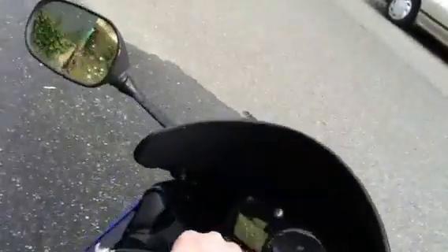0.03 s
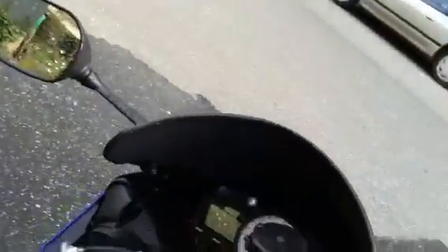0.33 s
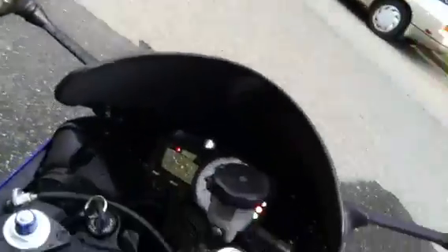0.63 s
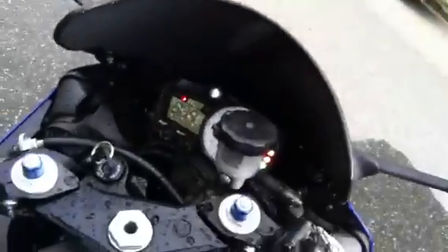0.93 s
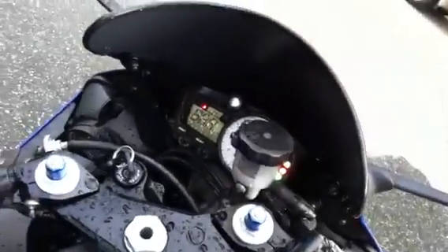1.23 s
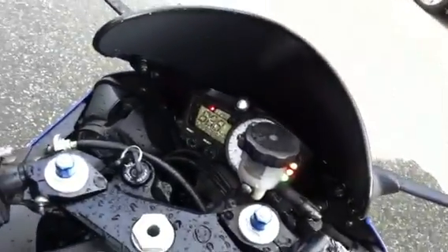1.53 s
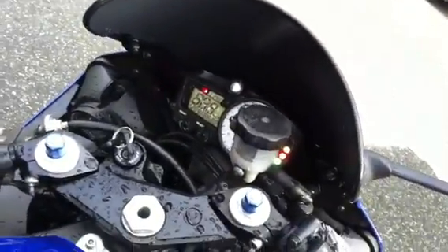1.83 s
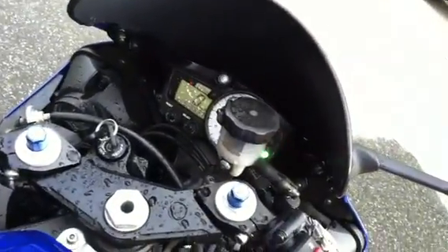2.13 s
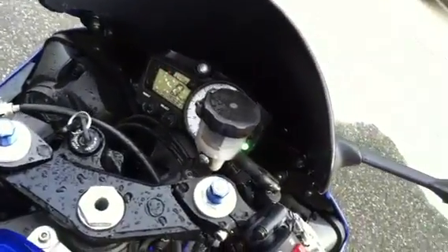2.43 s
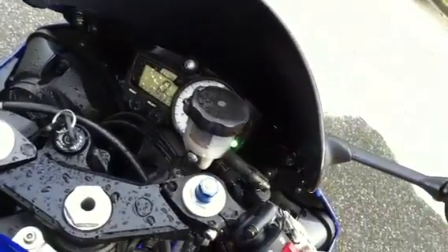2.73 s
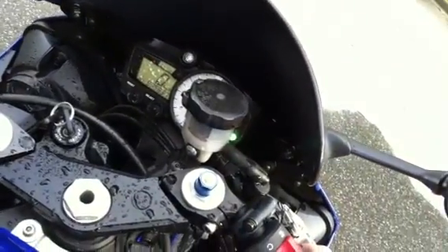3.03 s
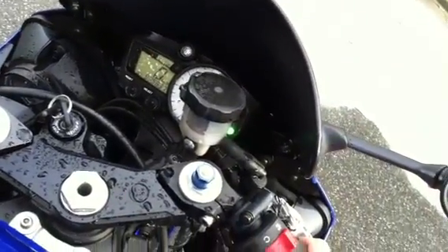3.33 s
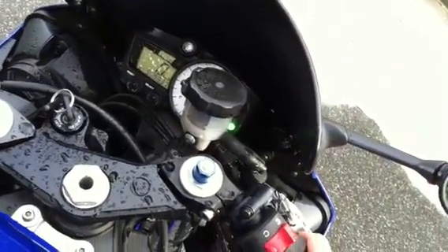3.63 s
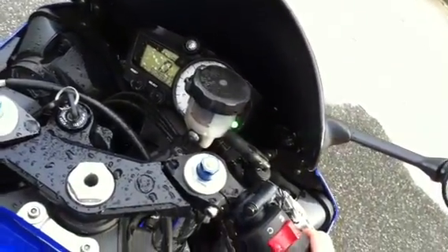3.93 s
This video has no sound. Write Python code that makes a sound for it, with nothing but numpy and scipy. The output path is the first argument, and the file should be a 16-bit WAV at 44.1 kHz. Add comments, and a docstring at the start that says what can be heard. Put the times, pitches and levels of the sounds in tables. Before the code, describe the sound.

A key clicks and a motorcycle's fuel pump whines steadily before the starter kicks in.

```python
"""An ignition key snaps on, close below the microphone, which is above the handlebars of a motorcycle
parked in a quiet street. A relay clicks; the electric fuel pump spins up, whines for three seconds
while the fuel churns, then runs down. The starter button ticks, the solenoid slams shut and the
starter gears begin to crank the engine. Traffic murmurs in the distance."""
import sys
import numpy as np
from scipy import signal
from scipy.fft import rfft, irfft
from scipy.io import wavfile
from scipy.ndimage import uniform_filter1d

SR = 44100
rng = np.random.default_rng(int(sys.argv[2]) if len(sys.argv) > 2 else 0)


def to_wav(sig):
    """Store sig (one row per channel, or 1-D mono) as 16-bit WAV at the path in sys.argv[1].

    Samples outside -1..1 are clipped; the rate is SR.
    """
    pcm = np.clip(np.atleast_2d(sig), -1, 1) * 32767
    pcm = np.round(pcm).astype(np.int16)
    wavfile.write(sys.argv[1], SR, pcm.T)  # frames by channels


N = 176400

# vane-passing rate of the pump, sagging as fuel pressure builds: t/s, f/Hz
VANE_RATE = [(.5, 4545), (.63, 4510), (.93, 4488), (1.12, 4477), (1.3, 4459), (1.5, 4448), (1.75, 4444),
             (2.0, 4432), (2.5, 4425), (2.8, 4418), (3.02, 4402), (3.35, 4393)]
# three whine partials, swelling and fading as the microphone moves: t/s, level/dB before the tilt
WHINE_FIRST = [(0.42, -55), (0.44, -53), (0.66, -62.5), (0.78, -54), (0.87, -56.5), (0.9, -51.5),
               (1.01, -49), (1.36, -55.5), (1.7, -52.5), (2.61, -58.5), (2.66, -63), (3.09, -59),
               (3.36, -60.5)]
WHINE_SECOND = [(0.42, -74), (0.44, -72), (1.17, -73), (1.3, -64), (1.69, -65), (1.71, -61), (2.54, -74),
                (3.12, -60), (3.36, -64)]
WHINE_THIRD = [(0.42, -63), (0.67, -59), (0.73, -67), (1.16, -57), (1.25, -63), (1.4, -61), (1.48, -67),
               (1.61, -61), (1.68, -66), (1.8, -57), (2.22, -53.5), (2.65, -64), (2.84, -60), (3.36, -64)]
# pump motor hum: t/s, lower tone level/dB, upper tone level/dB
HUM_LEVELS = [(.5, -64, -70), (.9, -59, -67.5), (1.5, -62, -62), (2.0, -61.5, -61), (2.6, -62.5, -61.5),
              (3.3, -67, -66.5)]
# spectrum of churning fuel: f/Hz, relative level/dB
HISS_SPECTRUM = [(300, -9), (800, 4), (1500, 0), (2400, -7), (3200, -5), (4000, 1.5), (4600, -0.5),
                 (5400, -7), (7200, -6.5), (8600, -5.5), (10500, -7), (13000, -2), (15500, -7.5)]
# fuel hiss: t/s, level/dB at full pump speed
HISS_LEVELS = [(.4, -53.5), (.62, -56), (1.0, -56.5), (1.6, -55.5), (2.2, -56), (2.9, -55.5), (3.34, -55),
               (3.39, -48.5), (3.44, -60)]
# thuds in the fuel line: t/s, level/dB, attack/s, decay/s
LINE_THUDS = [(0.378, -38.5, 0.011, 0.032), (.432, -55.5, .006, 0.18), (.61, -55, .02, .05),
              (3.435, -50, 0.0079, .04)]
# spectrum of a thud: f/Hz, relative level/dB
THUD_SPECTRUM = [(80, -24), (200, -5), (310, 1), (450, -1), (650, -10), (1200, -23.5), (3000, -42)]

# starter gear mesh rate: t/s, f/Hz
MESH_RATE = [(3.837, 250), (3.86, 558.8), (3.893, 769), (3.915, 829), (3.928, 971), (3.95, 982),
             (3.968, 1028), (4.0, 1039)]
# starter gears: t/s, whine level/dB, rattle level/dB
GEAR_LEVELS = [(3.837, -67, -37.5), (3.864, -58, -32.5), (3.876, -54, -37), (3.895, -44, -33),
               (3.917, -42, -34.5), (3.931, -29.5, -30.5), (3.96, -30, -26), (4.0, -29, -27.5)]
# gear whine harmonics, from the first up: relative level/dB
GEAR_HARMONICS = (-2, -10.5, -15, -13, -19)
# spectrum of rattling teeth: f/Hz, relative level/dB
RATTLE_SPECTRUM = [(60, -37), (120, -30), (200, -3.5), (400, -3), (520, -9), (760, -3), (1200, 3),
                   (2000, 4.5), (2650, -6.5), (3100, 2.5), (3900, 3), (4400, -1.5), (5000, 0),
                   (5800, -10.5), (8000, -8.5), (11400, -5), (14000, -15), (16000, -30)]
# crankcase resonances: f/Hz, relative level/dB, t60/s
CRANKCASE_MODES = [(798, -14.5, 0.076), (970, -14, 0.17), (1340, -8, 0.054), (1392, -7, 0.19),
                   (1470, -6.5, 0.12), (1526, -6, 0.12), (1581, -1, 0.18), (1636, -5, 0.12),
                   (1738, -7, .12), (1780, -11, 0.17), (3076, -12, .12), (3170, -11.5, .09),
                   (3416, -14.5, .14), (3760, -8.5, 0.098), (4070, -16, 0.11), (7320, -22, .12),
                   (8020, -19, .08), (8700, -21, 0.087), (10150, -18.5, .06), (11353, -19.5, .12)]
# the starter clutch snatches: t/s, level/dB before the trim, half-width/s
CLUTCH_KNOCKS = [(3.866, -30, 0.0044), (3.887, -24.5, 0.0082), (3.908, -21, 0.0035), (3.913, -25.5, .003),
                 (3.956, -25, 0.016), (3.991, -22, .004)]
# spectrum of the solenoid's clack: f/Hz, relative level/dB
CLACK_SPECTRUM = [(40, -45), (200, -11), (900, -5.5), (1500, -7), (2800, -4), (4300, 2.5), (5000, -2),
                  (5700, -9), (6200, -2), (6700, 6.5), (7500, -8), (8000, -3), (8900, 0), (9900, -7),
                  (12000, -13), (13500, -1), (16000, -17)]

# lock, relays and switches: t/s, level/dB before filtering, decay/s, tilt/(dB/octave), top f/Hz
SWITCH_CLICKS = [(0.068, -57, 0.0034, -1, 14000), (0.17, -38, 0.0089, 2.5, 14000),
                 (0.1754, -28.5, .004, 1, 14000), (.208, -53, 0.0052, 3, 14000),
                 (.280, -52, 0.0057, -4, 4500), (.346, -40, 0.0034, 1, 4500),
                 (0.3508, -32, 0.0025, 2, 5500), (0.362, -35, 0.0049, 2.5, 14000),
                 (0.371, -39.5, 0.0077, -2, 4500), (1.609, -46, .004, -3, 8000),
                 (3.7857, -42, 0.0023, 6.5, 14000)]
# spectrum of a click: f/Hz, relative level/dB
CLICK_SPECTRUM = [(150, -7), (600, -3), (1000, -7), (1700, 4), (2300, -1.5), (4500, 1), (5600, -6),
                  (6700, 0), (8800, -2.5), (9900, -11), (11000, 0.5), (13000, -2.5), (16000, -11.5)]
# lock and top yoke, rung by the key: f/Hz, level/dB, t60/s
YOKE_MODES = [(658, -40.5, 0.083), (1032, -41, 0.074), (1270, -41, 0.071), (1590, -38.5, 0.067),
              (1830, -42, .04), (2440, -57, .045), (3090, -47, 0.063), (3700, -47, 0.051)]
# a relay ticks after the pump starts and as it stops: t/s, relative level/dB
RELAY_TICKS = [(.478, 1), (3.364, -1)]
# brief high ring of that relay: f/Hz, level/dB, t60/s
RELAY_MODES = [(5550, -53, .035), (5950, -50.5, .035), (10700, -50, .03), (12950, -52, .035)]
# spectrum of distant traffic: f/Hz, relative level/dB
TRAFFIC_SPECTRUM = [(15, -76), (25, -49), (53, -27), (91, -18), (133, -5), (274, -4), (359, -7.5),
                    (410, -7.5), (445, -11.5), (666, -12.5), (762, -6.5), (826, -9), (1110, -9.5),
                    (1570, -14.5), (1950, -20.5), (2850, -29.5), (10900, -37), (13900, -33.5), (15500, -36)]

KEY_S, SOLENOID_S, CRANK_S = .176, 3.8362, 3.837
PUMP_ON_S, SPIN_UP_S, PUMP_OFF_S, RUN_DOWN_S = .366, .021, 3.368, .11
WHINE_ON_S, WHINE_RISE_S, WHINE_FADE_S, WHINE_TILT_DB_PER_OCTAVE = .398, .043, .016, 1.2
VANES, HUM_SHAFT_ORDERS = 47, (4, 8)
FLUTTER, DRIFT, SHAFT_WOBBLE, TOOTH_JITTER = .0008, .000402, .0008, .0053  # fractions of the pitch
GRIND_DEPTH, GRIND_FLICKER_DB, CASE_TRIM_DB, KNOCK_TRIM_DB = .67, 1.5, -.5, -2
LOW_CUT_HZ, TOP_HZ = 41, 15900


def fuel_pump(t):
    """Close by, impeller vanes whine, the motor hums and fuel hisses, all following the shaft speed."""
    coast_s = np.maximum(t - PUMP_OFF_S, 0)
    spin_up = 1 - np.exp(-np.maximum(t - PUMP_ON_S, 0) / SPIN_UP_S)
    speed = spin_up * np.exp(-coast_s / RUN_DOWN_S)
    vane_hz = curve(t, VANE_RATE) * speed * (1 + FLUTTER * wander(170) + DRIFT * wander(18))
    shaft = phase(vane_hz / VANES)
    vane = phase(vane_hz * (1 + SHAFT_WOBBLE * np.sin(shaft)))
    whine = hum = 0
    for k, levels in enumerate((WHINE_FIRST, WHINE_SECOND, WHINE_THIRD), 1):
        db = curve(t, levels) + WHINE_TILT_DB_PER_OCTAVE * np.log2(k) + .98 * wander(24.87)
        whine += undb(db) * np.sin(k * vane)
    whine *= np.clip((t - WHINE_ON_S) / WHINE_RISE_S, 0, 1) * np.exp(-coast_s / WHINE_FADE_S)
    for column, order in enumerate(HUM_SHAFT_ORDERS, 1):
        hum += undb(curve(t, HUM_LEVELS, column) + 1.7 * wander(12)) * np.sin(order * shaft)
    hiss = undb(curve(t, HISS_LEVELS) + .7 * wander(29.86)) * noise(HISS_SPECTRUM)
    hiss *= 1 + .21 * np.sin(shaft)  # one pulse per turn
    return np.sqrt(2) * (whine + hum * speed) + hiss * speed ** 2.8


def fuel_line(t):
    """Fuel surges in the line with dull thuds as the pump starts and stops."""
    thuds = sum(undb(db) * burst(t - at, attack, decay) for at, db, attack, decay in LINE_THUDS)
    return noise(THUD_SPECTRUM) * thuds


def starter(t):
    """Down at the engine, gear teeth gather speed: they whine, rattle and ring the crankcase."""
    mesh = phase(curve(t, MESH_RATE) * (1 + TOOTH_JITTER * wander(200)))
    engaged = np.clip((t - CRANK_S) / .0022, 0, 1)
    grind = rng.standard_normal(N) * (1 + GRIND_DEPTH * np.cos(mesh))  # one pulse per tooth
    grind *= undb(GRIND_FLICKER_DB * wander(300))
    whine = sum(undb(db + 2 * wander(90)) * np.sin(k * mesh + rng.uniform(0, 2 * np.pi))
                for k, db in enumerate(GEAR_HARMONICS, 1))
    whine *= np.sqrt(2) * undb(curve(t, GEAR_LEVELS))
    load = undb(curve(t, GEAR_LEVELS, column=2))
    rattle = colour(grind, RATTLE_SPECTRUM)
    rattle *= load / rms(rattle[t > CRANK_S])
    knocks = sum(undb(db + KNOCK_TRIM_DB) * np.exp(-((t - at) / width) ** 2)
                 for at, db, width in CLUTCH_KNOCKS)
    case_response = ring(t[:SR // 10], CRANKCASE_MODES)
    crankcase = steady(signal.fftconvolve(grind, case_response)[:N])
    crankcase *= np.hypot(load * undb(CASE_TRIM_DB), knocks)
    return engaged * (whine + rattle + crankcase)


def solenoid(t):
    """The plunger slams onto its contacts with a bright clack."""
    return undb(-23) * burst(t - SOLENOID_S, attack=.00086, decay=.0089) * noise(CLACK_SPECTRUM)


def switches(t):
    """Below the microphone, lock and contacts click, the key rings the yoke and a relay ticks."""
    clicks = 0
    for at, db, decay, tilt, top_hz in SWITCH_CLICKS:
        crack = burst(t - at, attack=.00048, decay=decay) * noise(CLICK_SPECTRUM, tilt)
        clicks += undb(db) * cut(crack, top_hz, "low", order=4)
    relay = sum(undb(db) * ring(t - at, RELAY_MODES) for at, db in RELAY_TICKS)
    yoke = ring(t - KEY_S, YOKE_MODES)
    return cut(clicks + relay + yoke, 220, "high")


def traffic():
    """Traffic far from the microphone, gently swelling."""
    return noise(TRAFFIC_SPECTRUM) * undb(-53.5 + .5 * wander(4.33))


def undb(db):
    """Decibels to gain."""
    return 10 ** (np.asarray(db) / 20)


def rms(x):
    """Root mean square."""
    return np.sqrt(np.mean(x ** 2))


def curve(t, rows, column=1):
    """One column of a table, joined by straight lines."""
    rows = np.array(rows)
    return np.interp(t, rows[:, 0], rows[:, column])


def colour(x, spectrum, tilt_db=0):
    """Give a sound a spectrum, tilted per octave; rms 1."""
    octave = np.log2(np.maximum(np.fft.rfftfreq(N, 1 / SR), 1))
    hz, db = np.array(spectrum).T
    gain_db = np.interp(octave, np.log2(hz), db) + tilt_db * np.maximum(octave, np.log2(hz[0]))
    shaped = irfft(rfft(x) * undb(gain_db), N)
    return shaped / rms(shaped)


def noise(spectrum, tilt_db=0):
    """Coloured noise of rms 1."""
    return colour(rng.standard_normal(N), spectrum, tilt_db)


def wander(rate_hz):
    """Smooth random motion of rms 1."""
    hold = max(int(SR / rate_hz), 1)
    steps = np.repeat(rng.standard_normal(N // hold + 1), hold)
    smooth = uniform_filter1d(steps, hold)[:N]
    return smooth / rms(smooth)


def burst(age, attack, decay):
    """Straight rise, exponential fall; times in seconds."""
    return np.clip(age / attack, 0, 1) * np.exp(-np.maximum(age - attack, 0) / decay)


def ring(age, modes):
    """Damped modes of alternating sign, silent before the blow."""
    age = np.maximum(age, 0)
    return sum((-1) ** k * undb(db) * np.sin(2 * np.pi * hz * age) * np.exp(-np.log(1000) * age / t60)
               for k, (hz, db, t60) in enumerate(modes))


def phase(hz):
    """Angle in radians of something turning at this rate."""
    return 2 * np.pi * np.cumsum(hz) / SR


def cut(x, hz, kind, order=2):
    """Low-pass or high-pass."""
    return signal.sosfilt(signal.butter(order, hz, kind, fs=SR, output="sos"), x)


def steady(x, samples=220):
    """Hold the rms at 1, evened over a few milliseconds."""
    return x / np.sqrt(uniform_filter1d(x ** 2, samples) + 1e-12)


def scene():
    """The motorcycle close, the traffic far off, at one microphone above the handlebars."""
    t = np.arange(N) / SR
    return (fuel_pump(t) + fuel_line(t) + switches(t) + solenoid(t) + starter(t) + traffic())[None]


def record(dry):
    """The recorder thins the deep bass and cuts the top steeply."""
    thinned = cut(dry, LOW_CUT_HZ, "high")
    return signal.sosfilt(signal.ellip(10, .2, 70, TOP_HZ, fs=SR, output="sos"), thinned)


dry = scene()
out = record(dry)
to_wav(out)
```